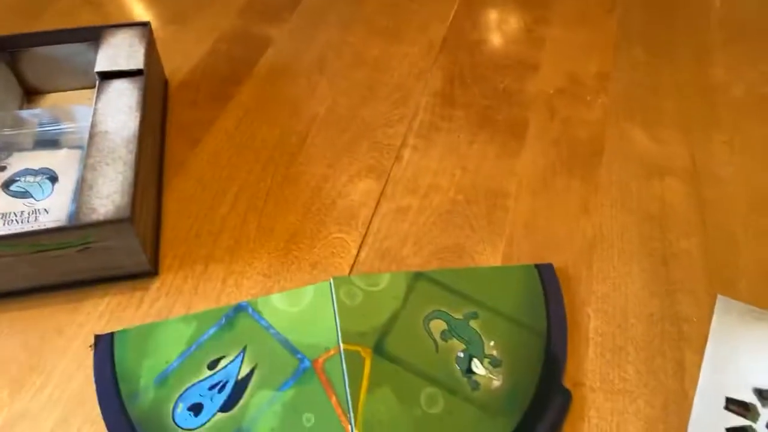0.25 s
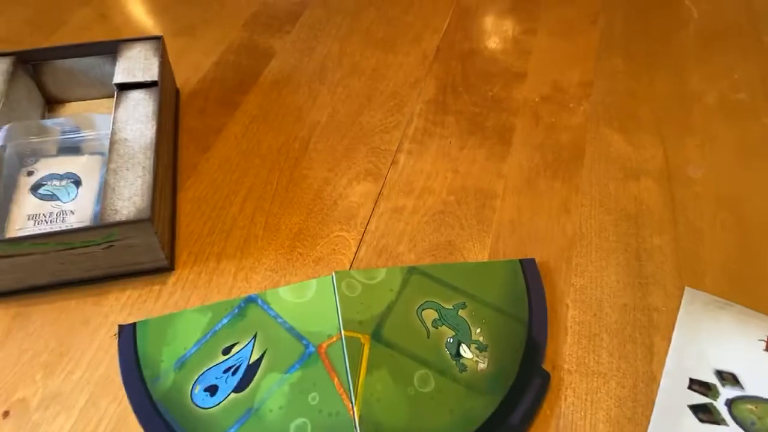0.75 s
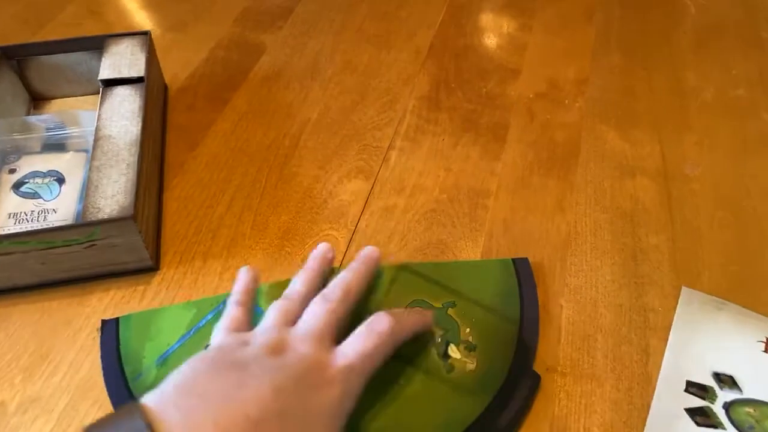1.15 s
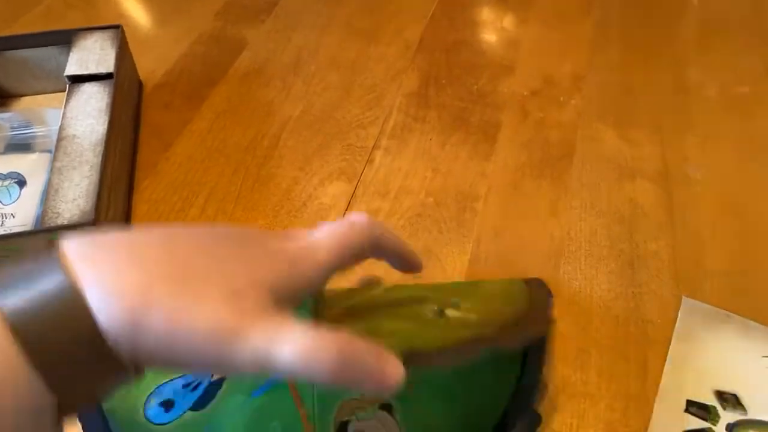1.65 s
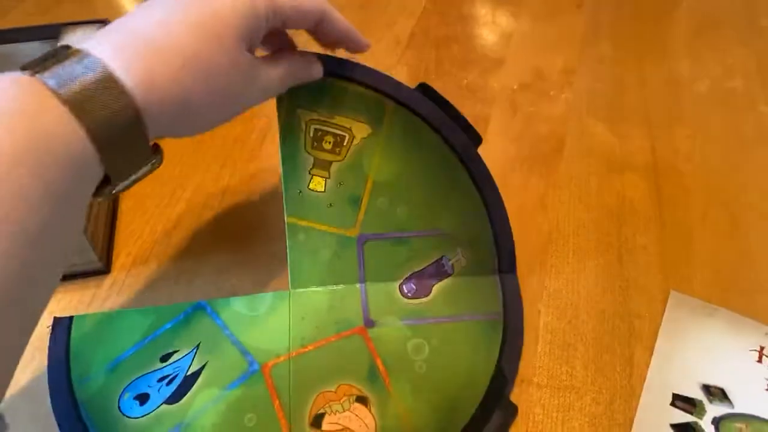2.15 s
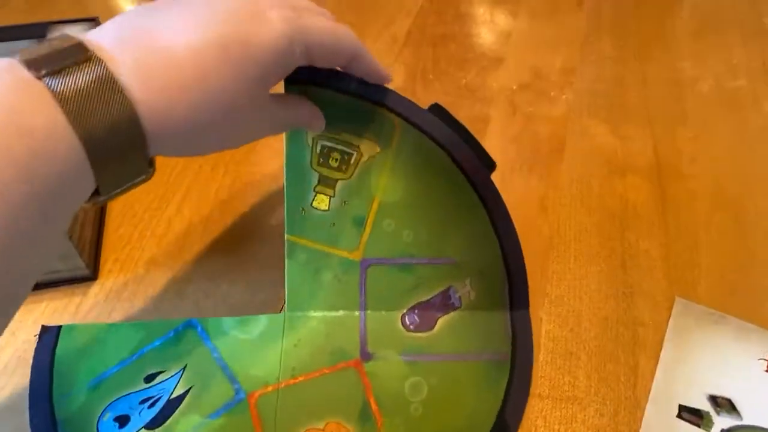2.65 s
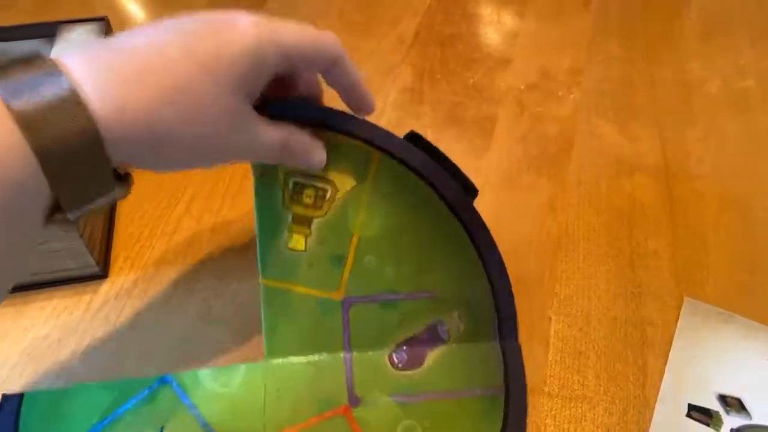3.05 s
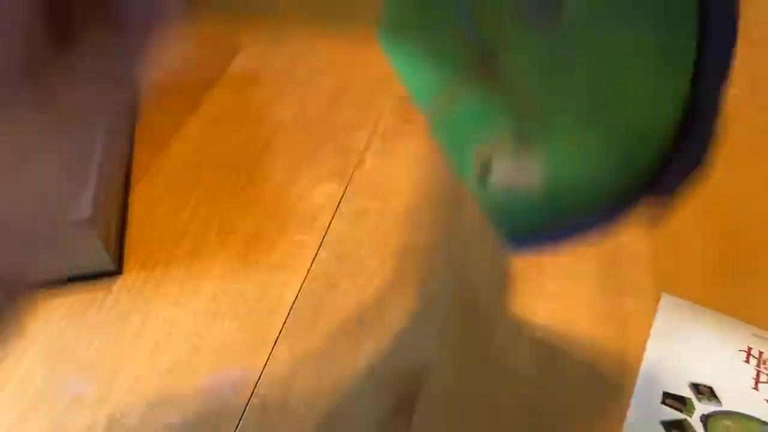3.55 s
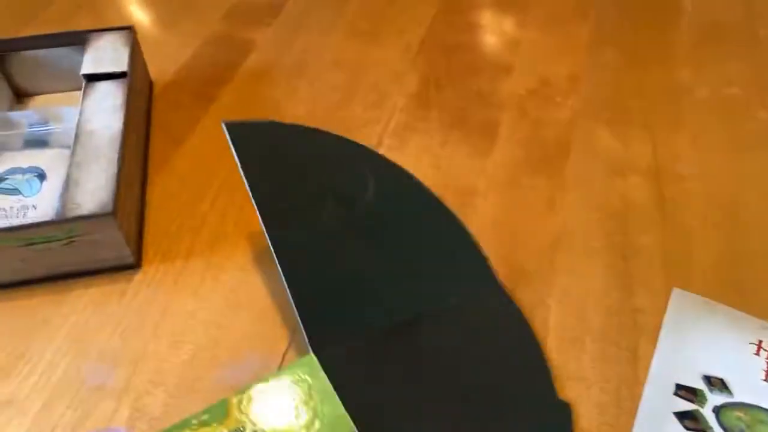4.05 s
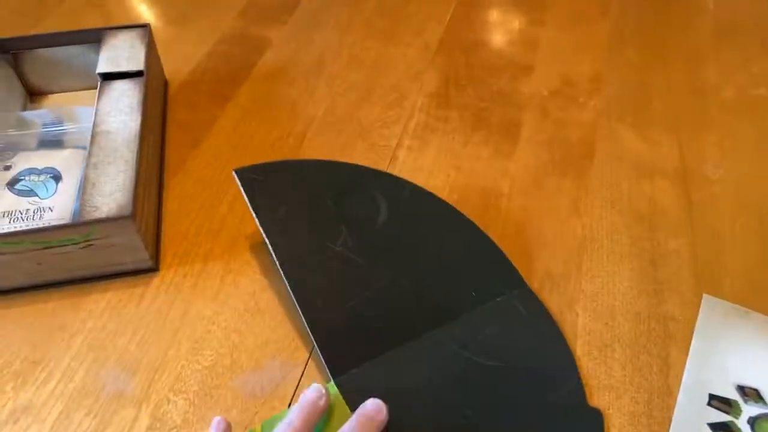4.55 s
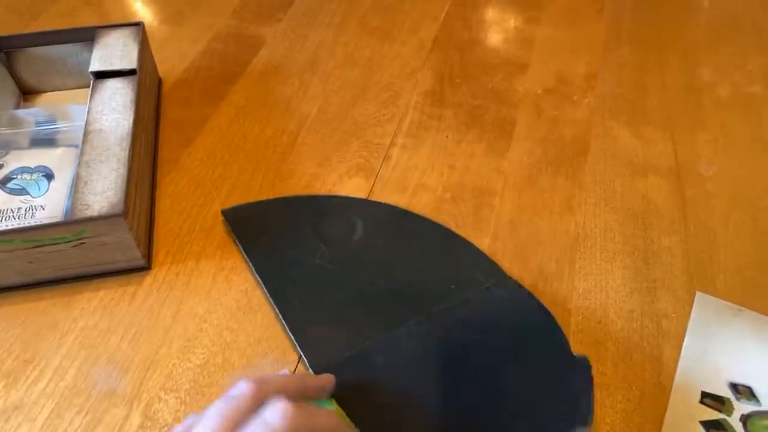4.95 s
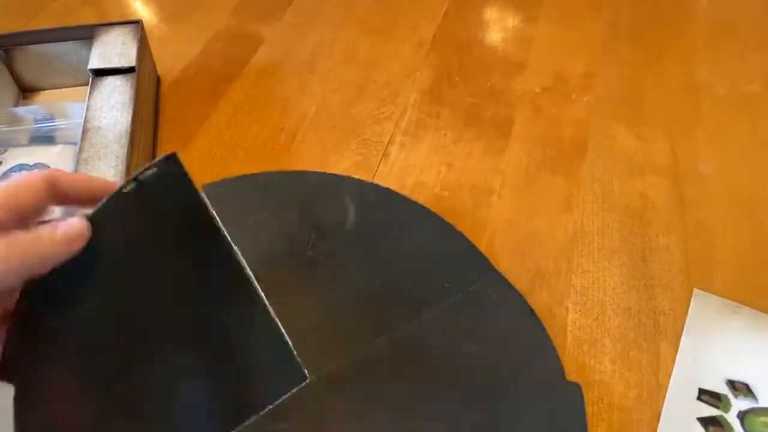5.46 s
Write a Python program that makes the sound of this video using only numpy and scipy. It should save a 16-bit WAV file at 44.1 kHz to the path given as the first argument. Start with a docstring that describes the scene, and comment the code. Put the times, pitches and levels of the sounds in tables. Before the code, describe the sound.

A stiff folding cardboard game board is opened on a wooden table in a small, lively room, heard by one close microphone. Low room rumble and very thin hiss run throughout. A faint tap comes at 0.2 s, then soft sliding leads to two dry, flat slaps at 0.64 and 0.68 s, with a short papery rattle. Quiet rubbing of board and skin continues from about 1 s. A small dull bump falls at 2.0 s, with tiny ticks and a barely audible crease squeak around 2.8 to 3.1 s. A clear hollow knock at 3.2 s and a lesser one at 3.55 s precede the loudest event, a heavy woody thud at 3.56 s with fast bounces. Around 4.0 to 4.1 s the crease gives a short, high rising squeak, a crisp crackling snap and a knock. It then quietens; sliding grows from 5.2 s, ending with weak thumps and a faint snap near 5.7 s.

```python
"""A folded cardboard game board is opened out on a wooden table in a small, live room.
It thuds on the table as bending waves and wood modes; its panels slap flat in bursts of tiny contacts.
The stiff crease squeaks, an unsteady tone over rasp, and snaps over with a crackle; light ticks ring the card.
Between the blows, hands and board slide softly as coloured noise over a low room rumble and thin hiss.
One microphone takes it all in; every blow and tick reaches it direct and with a diffuse room tail."""
import sys
import numpy as np
from scipy import signal
from scipy.fft import rfft, irfft, next_fast_len
from scipy.io import wavfile
from scipy.ndimage import uniform_filter1d, map_coordinates

SR = 44100
rng = np.random.default_rng(int(sys.argv[2]) if len(sys.argv) > 2 else 0)


def int16_out(signal):
    """Quantize to a 16-bit WAV file."""
    q = np.round(np.clip(np.atleast_2d(signal).T, -1, 1) * 32767)
    wavfile.write(sys.argv[1], SR, q.astype(np.int16))


N = 251791
SIZE = 32768  # samples in the response to one blow
HZ = np.fft.rfftfreq(SIZE, 1 / SR)
AGE = np.arange(SIZE) / SR  # s since the blow
TIME = np.arange(N) / SR  # s since the start


def thuds(travel=0.00244, ring_db=-3, attack=0.0022, crush=0.013, crush_hz=1100):
    """Soft blows send bending waves through the board and set the table ringing."""
    # Colour of the board meeting the table: f/Hz, level/dB per Hz
    thud_colour = [(30, -56), (60, -8.5), (115, 1), (160, -3.5), (200, -6), (290, 0), (410, -5.5),
                   (580, -14.5), (820, -16), (1000, -18.5), (1330, -22.5), (1600, -35), (3700, -38.5),
                   (6500, -50), (15000, -66)]
    # Ringing of the table top: f/Hz, level/dB before ring_db, t60/s
    table_modes = [(125.9, -13.5, 0.5), (192, -11.5, 0.19), (235, -28, 0.22), (261.1, -8.5, 0.26),
                   (358.4, -16.5, 0.34), (373, -18, .38), (401.2, -17, 0.18), (542, -22.5, 0.2),
                   (591, -22.5, 0.058), (733, -31, 0.31), (1080, -41, 0.2), (1090, -36.5, 0.9),
                   (1295, -39, 0.27)]
    track, ring = np.zeros(N), np.zeros(SIZE)
    card = pulse(thud_colour)
    for hz, db, t60 in table_modes:
        swell = 1 - np.exp(-AGE / attack)
        mode = np.sin(2 * np.pi * hz * AGE) * fade(AGE, t60) * swell
        ring += amp(db + ring_db) * mode / np.linalg.norm(mode)
    table = rfft(ring)
    # The bass is one push; the treble comes from the edge crushing down bit by bit.
    whole = 1 / (1 + (HZ / crush_hz) ** 4)
    for s, db, *weights in thud_contacts():
        push = np.sqrt(whole) * bending(travel)
        crushing = np.sqrt(1 - whole) * burst(crush, rate=11000)
        add(track, s, db, (card * (push + crushing) + table) * touch(*weights))
    return track


def thud_contacts():
    """A blow lands near edge first, then far edge; a dropped board bounces ever faster."""
    # Dull blows of the board on the table, and at 3.546 s a puff of air pressed out just ahead of the drop:
    # t/s, level/dB, bass/dB, knock/dB, tick/dB,
    blows = [(0.234, -50, 4, -1.5, 4, 0.0045, 0), (2.008, -39.5, -2.5, -8, -10, 0, 0.0051),
             (2.86, -48.5, 3, 0, -22.5, 0.0012, 0.0043), (3.184, -29, 2, 6.5, 0, .006, 0.0058),
             (3.546, -41, -4, -6, -8, 0.00061, 0.00039), (3.5566, -13.5, 0.5, -5, -3, 0.016, 0.057),
             (3.948, -56.5, -9, 11, 3, 0, 0), (4.001, -47.5, 5.5, -18, -8, 0.0018, 0),
             (4.087, -28, -1.5, -11, -17, 0.0085, 0.0018), (5.676, -46.5, 2.5, 5, -1, 0, 0.0033),
             (5.696, -39.5, -1, -11, -10, 0, 0.0048)]
    edge_loss_db, edge_bass_db, edge_knock_db = 9, -3.5, 3.5  # the far edge lands softer and hollower
    bounce_loss_db, bounce_fade_db = 16.5, 7.5  # the first bounce, then more for each later one
    bounce_shrink = 0.56  # each flight over the last
    bounce_bass_db, bounce_knock_db = -0.5, 4.5
    for s, db, bass_db, knock_db, tick_db, lag, flight in blows:
        yield s, db, bass_db, knock_db, tick_db
        if lag > 0:
            yield s + lag, db - edge_loss_db, bass_db + edge_bass_db, knock_db + edge_knock_db, tick_db
        if flight > 0:
            for k in range(3):
                s += flight * bounce_shrink ** k
                bounce_db = db - bounce_loss_db - k * bounce_fade_db
                yield s, bounce_db, bass_db + bounce_bass_db, knock_db + bounce_knock_db, tick_db


def slaps():
    """A panel lands flat on its two edges, stiff card clapping with little bending."""
    # Colour of the panel landing: f/Hz, level/dB per Hz
    slap_colour = [(50, -18), (150, -12), (290, 2.5), (430, -5), (570, -3.5), (800, -10.5), (1100, -7.5),
                   (1650, -15.5), (2250, -18.5), (3100, -27), (4800, -27.5), (7000, -33.5), (9500, -38.5),
                   (15000, -41.5)]
    return claps(slap_contacts(), slap_colour, rate=4000, travel=0.00078)


def slap_contacts(clap_tick_db=-3, rattle_bass_db=-1, rattle_knock_db=3,
                  rock_bass_db=2, rock_knock_db=1, rock_tick_db=-5):
    """Each edge claps down dully and rattles; after the last the panel rocks to rest."""
    # The two edges landing: t/s, level/dB, rattle t30/s, rattle against clap/dB, rattle brightness/dB
    landings = [(0.6366, -28.5, 0.079, 0.5, 6), (0.677, -27.5, 0.034, -2.5, 6.5)]
    clap_chatter, rattle_delay = 0.014, 0.006  # s
    rock_s, rock_loss_db, rock_chatter = 0.038, 10.5, 0.021  # s and dB per rock, then t30 in s
    for s, db, rattle, rattle_db, bright_db in landings:
        yield s, db, 0, 0, clap_tick_db, clap_chatter
        yield s + rattle_delay, db + rattle_db, rattle_bass_db, rattle_knock_db, bright_db, rattle
    for k in (1, 2):
        yield s + k * rock_s, db - k * rock_loss_db, rock_bass_db, rock_knock_db, rock_tick_db, rock_chatter


def snaps():
    """The stiff crease snaps over in a dense burst of contacts."""
    # Colour of the crease snapping: f/Hz, level/dB per Hz
    snap_colour = [(60, -5), (300, 4.5), (580, -13), (950, 3), (1350, -4), (1950, -9), (2600, -4.5),
                   (3000, -7), (3450, -4.5), (4300, -6.5), (5400, -14.5), (7200, -16.5), (10000, -27),
                   (15000, -39)]
    return claps(snap_contacts(), snap_colour, rate=9000, travel=0.00149)


def snap_contacts(crackle_bass_db=3, crackle_knock_db=-2):
    """Each snap leaves the fibres crackling, and the hard ones far more."""
    # The crease snapping over: t/s, level/dB, bass/dB, knock/dB, tick/dB, chatter t30/s
    crease_snaps = [(3.999, -52, 1, 4, -8, 0.0011), (4.065, -27, -5, 0.5, -2, 0.0065),
                    (5.6554, -47, 4.5, 6, -4, 0.008)]
    crackle_delay, crackle_chatter = 0.008, 0.046  # s, t30 in s
    loudest_crackle_db, crackle_tick_db = -11, 10.5  # against the hardest snap; against the snap's tick
    crackle_grows = 1.4  # dB of crackle per dB of snap
    hardest_db = max(row[1] for row in crease_snaps)
    for s, db, bass_db, knock_db, tick_db, chatter in crease_snaps:
        yield s, db, bass_db, knock_db, tick_db, chatter
        crackle_db = hardest_db + loudest_crackle_db + crackle_grows * (db - hardest_db)
        bright_db = tick_db + crackle_tick_db
        yield s + crackle_delay, crackle_db, crackle_bass_db, crackle_knock_db, bright_db, crackle_chatter


def claps(rows, spectrum, rate, travel):
    """Stiff card meets its support in a burst of contacts, spread a little by the bending panel."""
    track, card = np.zeros(N), pulse(spectrum) * bending(travel)
    for s, db, bass_db, knock_db, tick_db, chatter in rows:
        add(track, s, db, card * touch(bass_db, knock_db, tick_db) * burst(chatter, rate))
    return track


def ticks(chatter=0.0059, click_db=-8):
    """A light hard touch clicks and rings the card's high modes for a moment."""
    # Fingernails and edges touching the card: t/s, level/dB, brightness/dB
    touches = [(0.191, -68.5, 12.5), (0.2345, -54, -26), (2.0075, -60.5, 5.5), (2.839, -60, 0),
               (2.903, -54, -7), (3.081, -54.5, -13), (3.383, -65, -5), (5.052, -58, 5)]
    # What a light tick rings with: f/Hz, relative level/dB, t60/s
    tick_modes = [(960, 0, 0.0077), (1580, -1.5, .008), (2680, 1, 0.0081), (3870, -7, 0.0076),
                  (4480, -9, .007), (5350, -5, 0.0058), (6870, -9.5, .005), (8600, -16, .003)]
    track, ring = np.zeros(N), np.zeros(SIZE)
    for hz, db, t60 in tick_modes:
        mode = np.sin(2 * np.pi * hz * AGE) * fade(AGE, t60)
        ring += amp(db) * mode / np.linalg.norm(mode)
    card = rfft(ring / np.linalg.norm(ring)) + amp(click_db)
    for s, db, bright_db in touches:
        tilt = causal(along([(1500, 0), (6000, bright_db)], HZ))
        add(track, s, db, card * tilt * burst(chatter, rate=4200))
    return track


def squeak(tone_db=-2, lower_db=-11, rasp_db=-3, waver=0.026):
    """The crease sticks and slips: an unsteady high tone and its lower octave over a papery rasp."""
    # The crease under strain: t/s, length/s, level/dB, starting f/Hz before waver, rise/Hz per s
    squeaks = [(2.76, .11, -71, 3450, 0), (3.039, 0.036, -69, 3450, 0), (3.999, .062, -47, 3374, 3600)]
    # Colour of the rasp: f/Hz, level/dB per Hz
    rasp_colour = [(600, -16), (1300, 6), (1800, 12.5), (2500, 5), (3500, 4), (4400, 0), (5400, -5),
                   (6200, -17), (15000, -25.5)]
    track = np.zeros(N)
    for s, length, db, hz, rise in squeaks:
        pitch = hz + rise * np.clip(TIME - s, 0, length)
        phase = 2 * np.pi * np.cumsum(pitch * (1 + waver * wobble(550))) / SR
        octaves = np.sin(phase) + amp(lower_db) * np.sin(phase / 2)
        tone = unit(octaves * amp(5.8 * wobble(300)))
        rasp = unit(noise(rasp_colour) * amp(1.6 * wobble(900)))
        strain = stroke(s, length, attack=0.0033, release=0.004, swell_db=-2.5)
        track += strain * amp(db) * (amp(tone_db) * tone + amp(rasp_db) * rasp)
    return track


def sliding(grain_db=0.5):
    """Card and fingers slide with a noisy hiss, catching finely on the grain."""
    # The board sliding on the wood: t/s, length/s, level/dB
    slides = [(.33, 0.31, -62.5), (1.02, .6, -63), (1.78, 0.087, -68.5), (2.8, .12, -69),
              (3.06, .03, -60.5), (5.26, 0.78, -61)]
    # Skin brushing the printed face: t/s, length/s, level/dB
    brushes = [(.02, 0.15, -79.5), (.3, .32, -69), (1.14, 0.03, -74), (1.57, 0.34, -74), (2.03, .12, -78),
               (2.44, 0.086, -75.5), (2.81, .08, -73), (5.08, 0.25, -73.5)]
    # Colours of board on wood and of skin on card: f/Hz, level/dB per Hz
    slide_colour = [(200, -22), (500, 8), (1500, 5.5), (2400, 0.5), (3100, -1), (3450, 1.5), (3900, -3),
                    (7200, -10), (8500, -21), (15000, -27.5)]
    brush_colour = [(2000, -11.5), (5000, 1.5), (8000, -3), (15000, -10)]
    board = rubbing(slides, attack=0.095, release=0.078, swell_db=4, rest_db=-67.5)
    skin = rubbing(brushes, attack=0.091, release=0.07, swell_db=1.5, rest_db=-80.5)
    grain = unit(amp(grain_db * wobble(350)))
    return grain * (board * noise(slide_colour) + skin * noise(brush_colour))


def rubbing(rows, attack, release, swell_db, rest_db):
    """Gain of a series of strokes over the faint friction of holding the board."""
    power = sum((amp(db) * stroke(s, length, attack, release, swell_db)) ** 2 for s, length, db in rows)
    return np.sqrt(power + amp(rest_db) ** 2)


def stroke(start, length, attack, release, swell_db):
    """Gain of one movement: it rises, holds while changing by swell_db, and lets go."""
    end = start + length
    gate = np.interp(TIME, [start - attack, start, end, end + release], [0, 1, 1, 0])
    progress = np.clip((TIME - start) / length, 0, 1)
    return gate * amp(swell_db * (progress - 0.5))


def background(rumble_db=-54.5, hiss_db=-67, drift_db=2.0):
    """The room at rest: a low rumble of drifting level and a thin steady hiss."""
    # Colours of the quiet room, low and high: f/Hz, level/dB per Hz
    rumble_colour = [(18, -62), (30, -29), (40, -21), (59, -7), (77, -6), (97, -10.5), (177, -2), (263, -5),
                     (300, 1), (338, -6.5), (494, -11.5), (556, -14), (814, -22.5), (876, -16),
                     (1000, -32.5), (1300, -72), (2200, -120)]
    hiss_colour = [(410, -23.5), (700, -3), (1480, -9), (1660, -13.5), (1820, -10.5), (3230, -30),
                   (4600, -28), (14600, -34.5), (16000, -46)]
    rumble = amp(rumble_db + drift_db * wobble(10)) * noise(rumble_colour)
    return rumble + amp(hiss_db) * noise(hiss_colour)


def pulse(spectrum):
    """Response of the card to a contact of this colour, with energy 1."""
    # Resonances of the card itself, in thuds, slaps and snaps: f/Hz, width/Hz, level/dB
    card_modes = [(271.6, 60, 4.5), (403.6, 34, 6), (1029, 70, 6), (1345, 30, 4), (1574, 69, 4),
                  (1764, 180, 6.5), (2200, 190, 5.5), (2710, 76, 4.5), (3480, 280, 2), (4300, 660, 1),
                  (5015, 1000, 3), (6800, 790, 2.5)]
    peaks = sum(db / (1 + (2 * (HZ - hz) / width) ** 2) for hz, width, db in card_modes)
    response = causal(along(spectrum, HZ) + peaks)
    return response / np.linalg.norm(irfft(response))


def bending(travel):
    """Bending waves are slower in the bass: travel is their delay in s at 300 Hz."""
    return np.exp(-4j * np.pi * travel * np.sqrt(300 * HZ))


def burst(chatter, rate):
    """Spectrum of a run of tiny contacts, rate a second, dying by 30 dB in chatter seconds."""
    contacts = rng.standard_normal(SIZE) * (rng.random(SIZE) < rate / SR)
    contacts[0] = 1
    return even(contacts * fade(AGE, 2 * chatter), size=600)


def touch(bass_db, knock_db, tick_db):
    """Where and how hard the board lands shifts the weight of bass, knock and tick."""
    return causal(along([(450, bass_db), (700, knock_db), (900, knock_db), (2200, tick_db)], HZ))


def room(build=0.0023):
    """Direct sound plus a fresh diffuse tail that builds up as the walls answer."""
    # How long the room rings: f/Hz, t60/s
    room_t60 = [(100, 0.52), (300, 0.24), (1000, 0.34), (4500, 0.33), (13000, 0.27)]
    # How loud the tail is against the direct sound: f/Hz, level/dB
    room_db = [(60, -4.5), (120, -7), (260, -7.5), (600, 1.5), (1200, 1.5), (4000, -0.5), (13000, -2)]
    hz, t, z = signal.stft(rng.standard_normal(SIZE), SR, nperseg=256)
    decaying = z * fade(t, along(room_t60, hz)[:, None])
    tail = signal.istft(decaying, SR, nperseg=256)[1][:SIZE]
    tail *= 1 - np.exp(-(AGE / build) ** 2)
    return 1 + even(tail, size=160) * amp(along(room_db, HZ))


def add(track, s, db, response):
    """Place one blow in the room; db is the rms over 10 ms of a response of energy 1, before the room."""
    lead = 256  # samples kept ahead of the blow, since evened spectra spread a little backwards
    sound = np.roll(irfft(response * room()), lead) * amp(db) * np.sqrt(SR / 100)
    part = track[round(s * SR) - lead:][:SIZE]
    part += sound[:len(part)]


def amp(db):
    """Decibels to gain."""
    return 10 ** (np.asarray(db) / 20)


def unit(x):
    """Scale to rms 1."""
    return x / np.sqrt(np.mean(x ** 2) + 1e-20)


def along(points, hz):
    """Read (Hz, value) points on a log axis, level beyond the ends."""
    f, v = np.transpose(points)
    return np.interp(np.log(hz + 1), np.log(f + 1), v)


def fade(t, t60):
    """Exponential decay by 60 dB in t60 seconds."""
    return np.exp(-np.log(1000) * t / np.maximum(t60, 1e-4))


def filtered(x, gain):
    """x times a gain that depends on frequency."""
    m = next_fast_len(N + SIZE)
    return irfft(rfft(x, m) * gain(np.fft.rfftfreq(m, 1 / SR)), m)[:N]


def noise(spectrum):
    """Coloured noise of rms 1."""
    return unit(filtered(rng.standard_normal(N), lambda hz: amp(along(spectrum, hz))))


def wobble(rate):
    """A smooth random curve, rate knots a second."""
    return map_coordinates(rng.standard_normal(int(N * rate / SR) + 4), [TIME * rate])


def causal(db):
    """The minimum-phase response with these gains, which never sounds before its cause."""
    cepstrum = irfft(np.log(amp(db)))
    cepstrum[1:SIZE // 2] *= 2
    cepstrum[SIZE // 2 + 1:] = 0
    return np.exp(rfft(cepstrum))


def even(x, size):
    """Spectrum of x with its fine ripple kept and its broad trend, over size bins, made flat."""
    z = rfft(x, SIZE)
    return z / np.sqrt(np.abs(uniform_filter1d(np.abs(z) ** 2, size)) + 1e-20)


def scene():
    """All sources at one microphone."""
    blows = thuds() + slaps() + snaps() + ticks()
    return (blows + squeak() + sliding() + background())[None]


def record(dry, low_cut_hz=36, top_hz=15800):
    """The microphone loses the deepest bass; the recorder keeps nothing above its band limit."""
    low_cut = signal.butter(3, low_cut_hz, "high", fs=SR, output="sos")
    thinned = signal.sosfilt(low_cut, dry[0])
    return filtered(thinned, lambda hz: hz < top_hz)[None]


dry = scene()
out = record(dry)
int16_out(out)
```